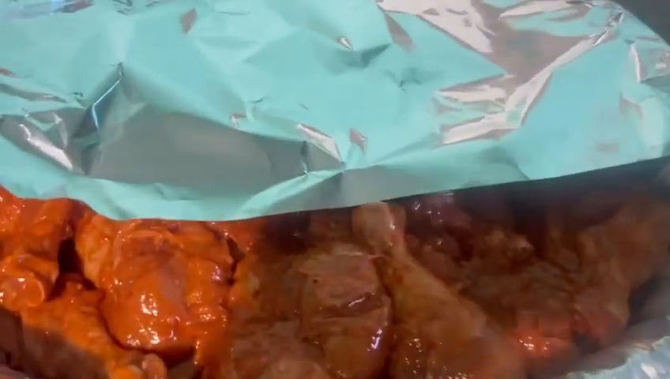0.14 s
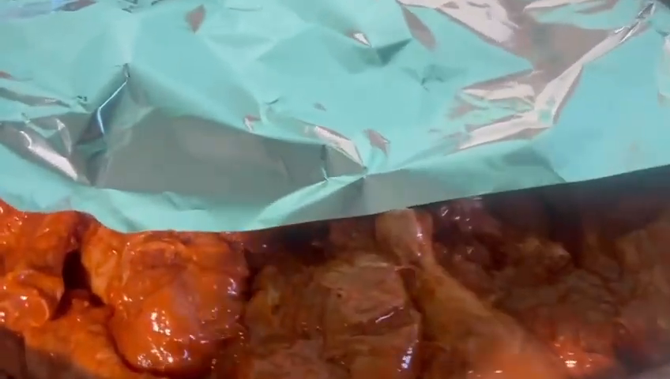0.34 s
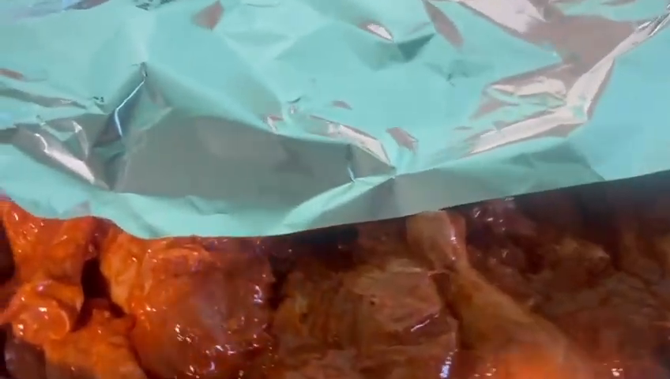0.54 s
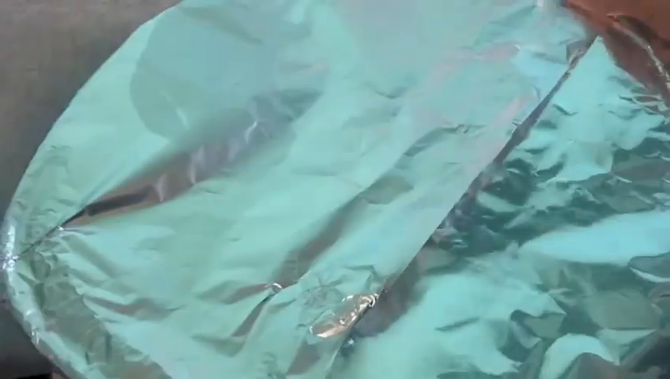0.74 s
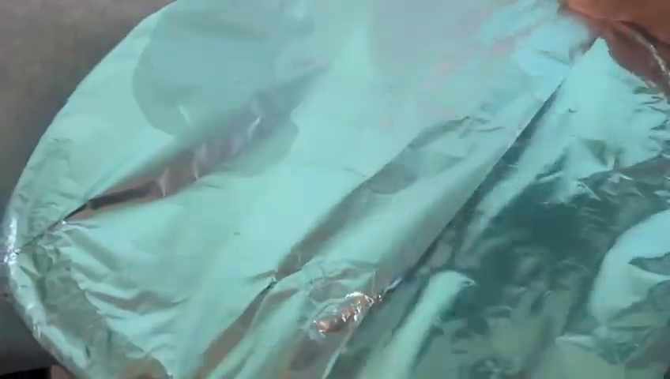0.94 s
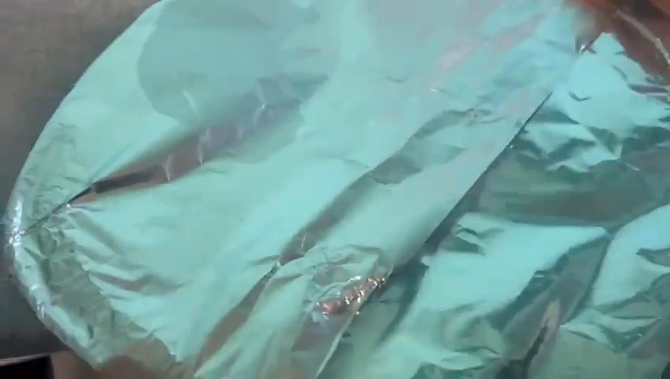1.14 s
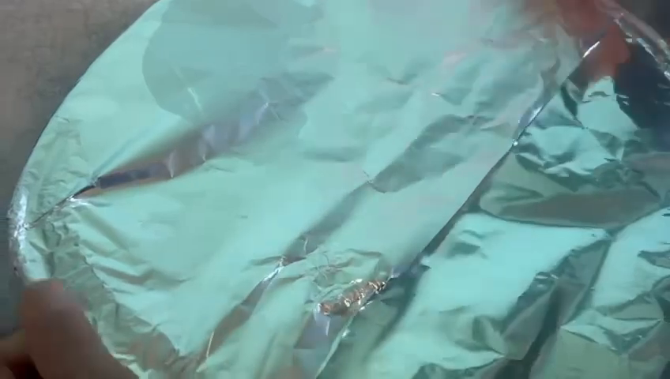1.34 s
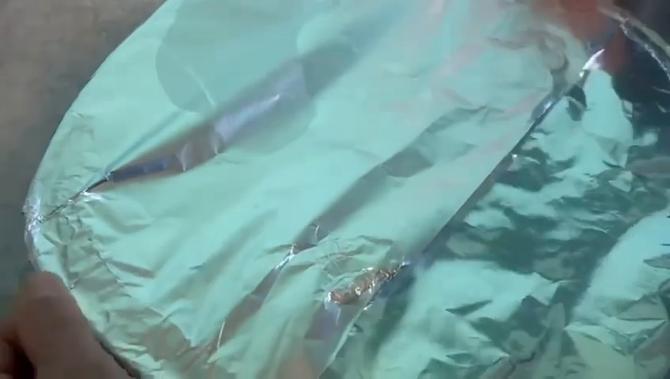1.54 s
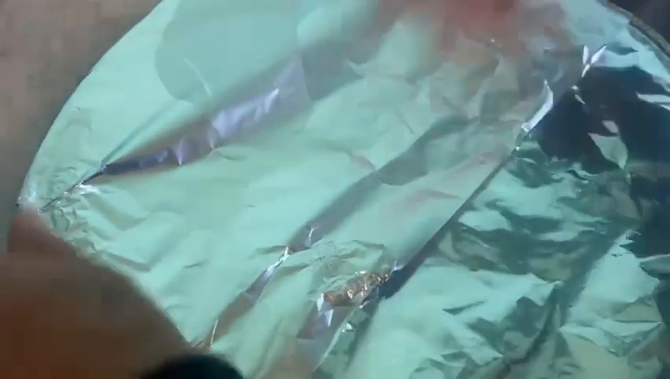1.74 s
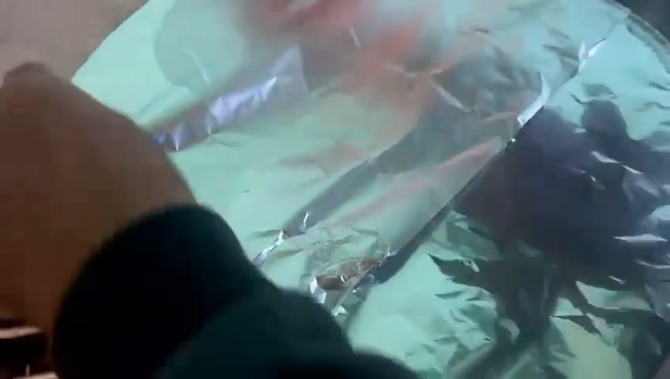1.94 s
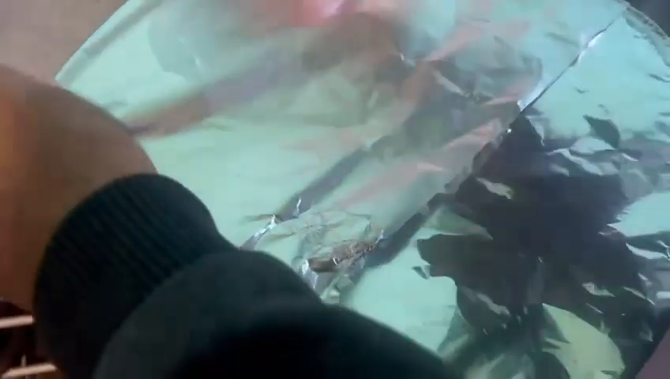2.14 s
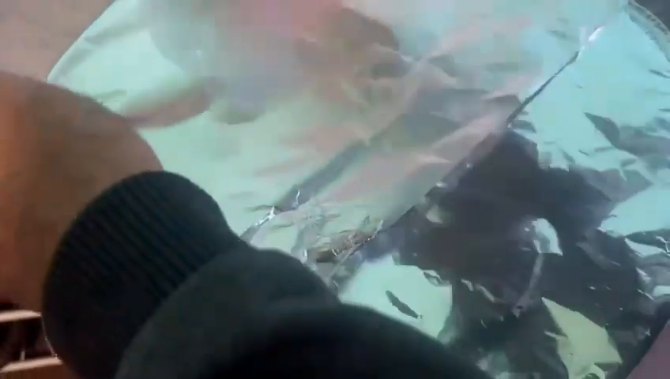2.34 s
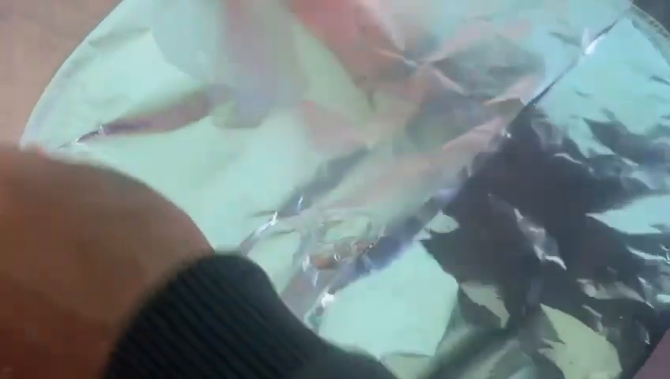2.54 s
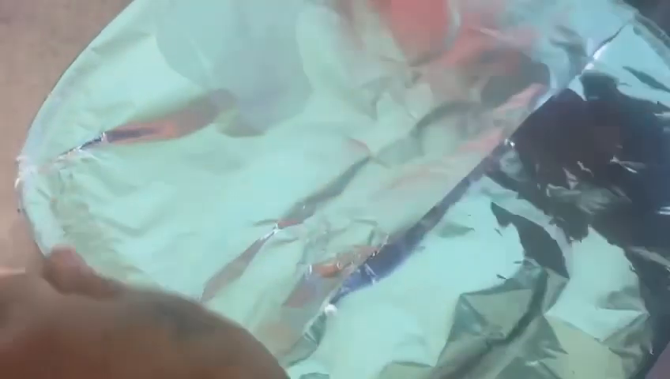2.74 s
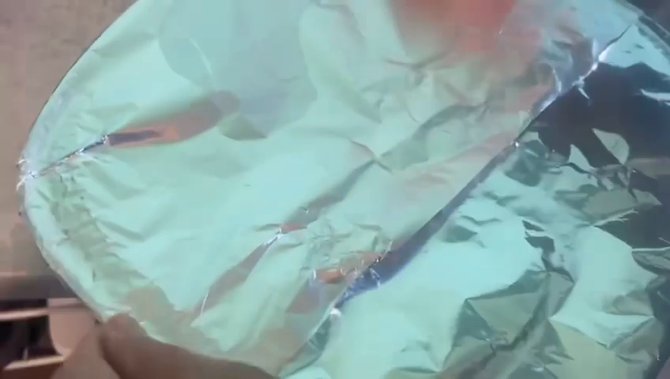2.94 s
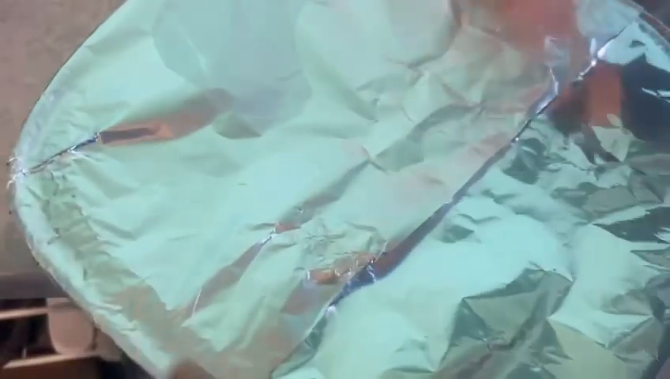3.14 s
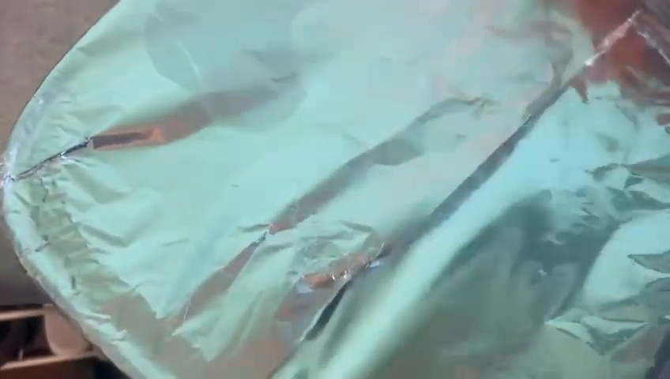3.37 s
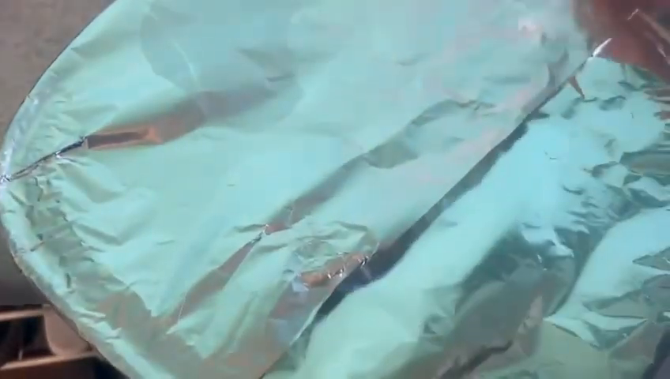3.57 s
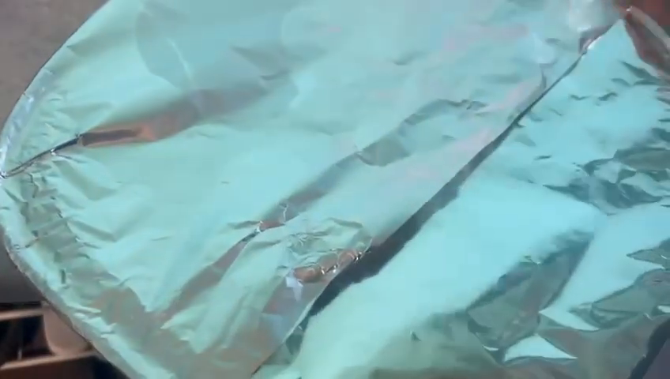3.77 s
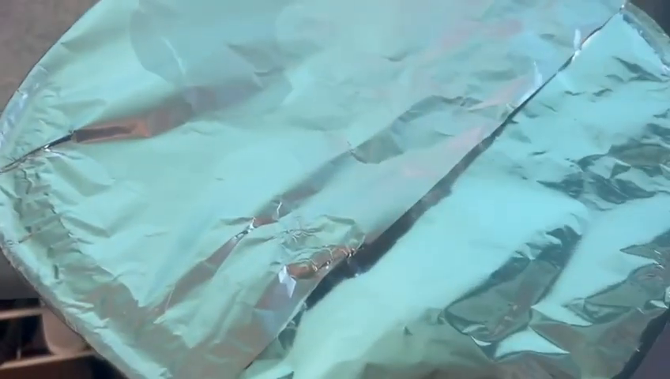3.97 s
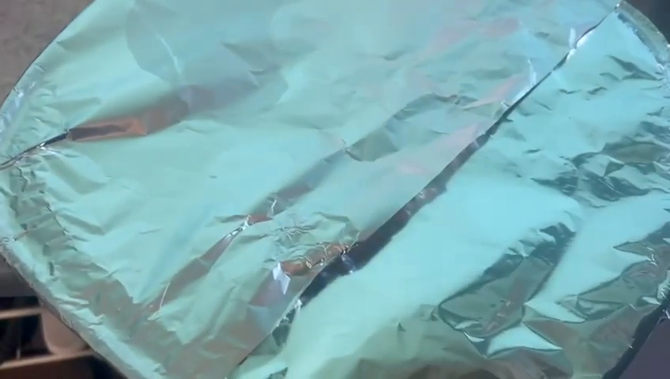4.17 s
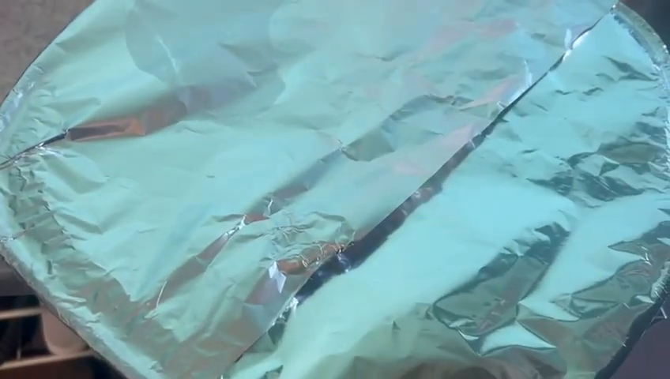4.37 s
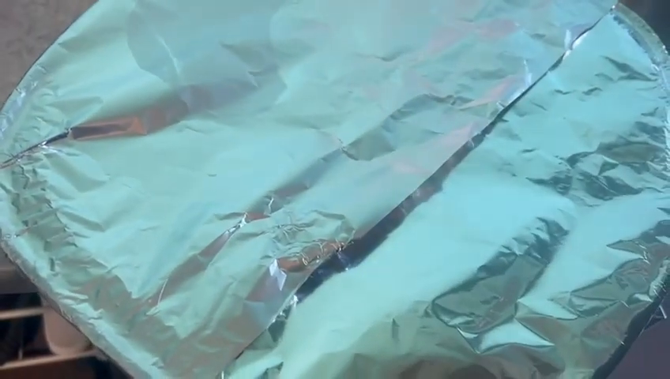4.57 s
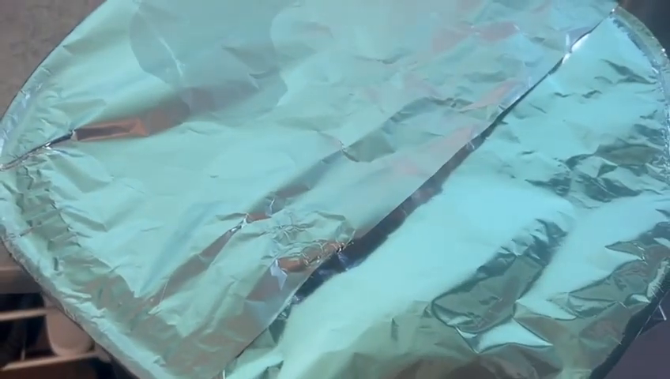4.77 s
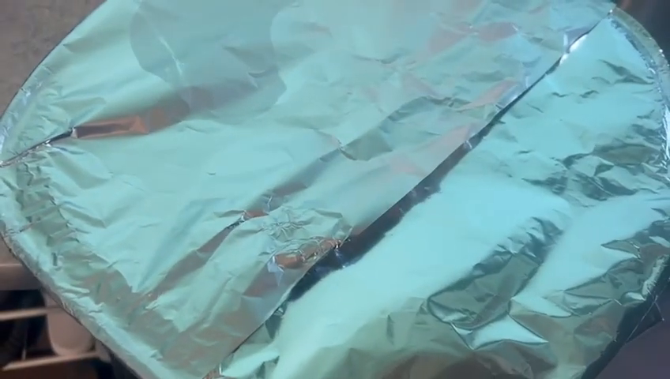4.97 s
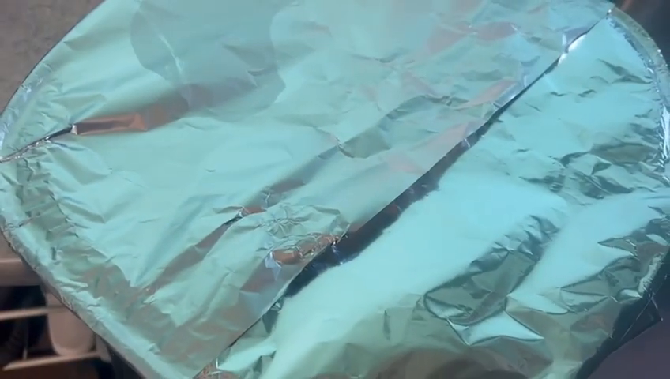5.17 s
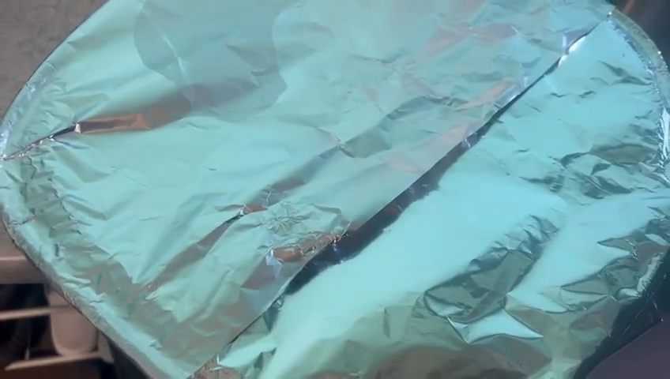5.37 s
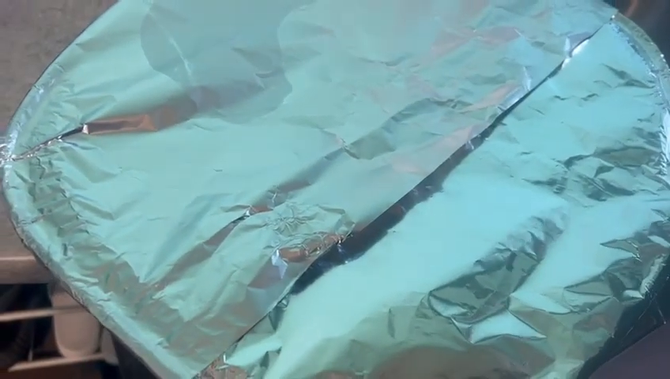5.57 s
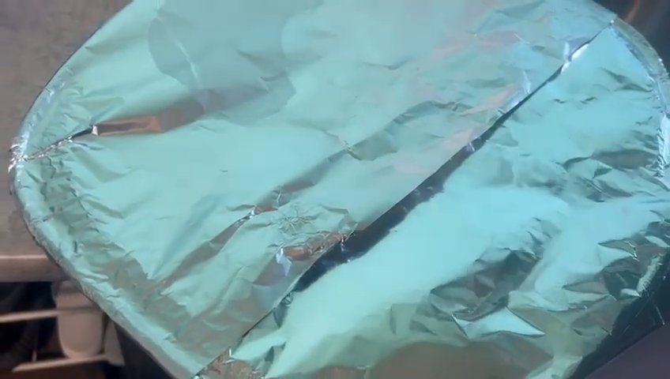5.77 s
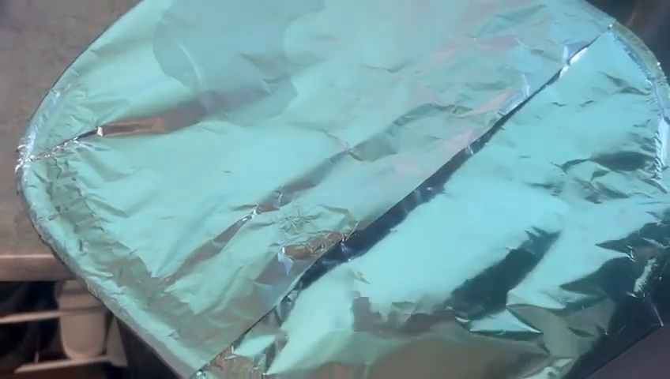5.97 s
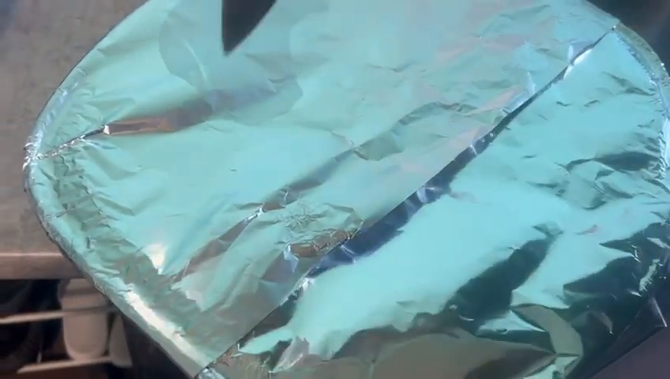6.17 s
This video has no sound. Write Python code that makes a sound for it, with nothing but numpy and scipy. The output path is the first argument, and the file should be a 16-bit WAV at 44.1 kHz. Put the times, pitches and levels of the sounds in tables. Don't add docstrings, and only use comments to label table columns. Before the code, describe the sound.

After a faint hum and a tiny dropout, foil crinkles loudly at close range; later a metal door clacks shut, then thin metallic squeaks and light foil touches.

```python
import sys
import numpy as np
from scipy import signal
from scipy.fft import rfft, irfft, next_fast_len
from scipy.io import wavfile
from scipy.ndimage import uniform_filter1d, map_coordinates

SR = 44100
rng = np.random.default_rng(int(sys.argv[2]) if len(sys.argv) > 2 else 0)


def boost_factor(decibels):
    exponent = np.asarray(decibels, float) / 20
    return 10 ** exponent


def output_pcm(signal):
    pcm = np.clip(np.atleast_2d(signal).T, -1, 1) * 32767
    wavfile.write(sys.argv[1], SR, np.round(pcm).astype(np.int16))


N = 273861
T = np.arange(N) / SR
SILENCE_START_S, SILENCE_END_S = 0.6672, 0.7135

# frequency in Hz, level in dB.
FAN_AIR = [(15, -38.5), (25, -12), (88, 1.5), (172, -9.5), (277, -5.5), (404, -10.5), (737, -21),
           (1020, -23.5), (2010, -33.5), (2650, -34.5), (3240, -49.5), (7780, -54), (10000, -74),
           (13000, -108), (22000, -120)]
# centre in Hz, width in Hz, level in dB before the silence, then the same after.
FAN_DRONES = [(91.2, 14, -51, 107.7, 3.8, -50), (189, 17, -60.5, 236.5, 21, -56),
              (286, 35, -54, 272.4, 13.7, -50)]

# start in seconds, swell in seconds, hold in seconds, top in dB,
# sag over the hold in dB.
SPREADING = [
    (0.0, 0.001, 0.16, -51.5, 30),
    (0.705, 0.0017, 0.15, -31.5, 0),
    (0.875, 0.062, 0.12, -19.5, 13.5),
    (1.075, 0.041, 0.066, -25.5, 4),
    (1.298, 0.0032, 0.085, -39, -5),
    (1.414, 0.032, 0.07, -21.5, 0),
    (1.592, 0.027, 0.082, -29.5, 3),
    (1.792, 0.018, 0.035, -34.5, 10.5),
]
CRIMPING = [(1.994, 0.034, 0.23, -21.5, 5.5), (2.249, 0.16, 0.18, -22, 12), (2.6, 0.022, 0.2, -25.5, 9.1),
            (2.81, 0.0086, 0.11, -38, 4.7), (2.928, 0.0024, 0.02, -31, 8.6), (2.983, .008, 0.049, -34, 17),
            (3.061, .004, 0.014, -42.5, 3), (3.089, 0.02, 0.047, -40.5, 3), (3.18, 0.031, .02, -39, 0.81),
            (3.2385, 0.022, 0.087, -24.5, 0.77), (3.352, 0.017, 0.14, -17.5, 19),
            (3.5, 0.012, 0.038, -27.5, 13.5), (3.6, 0.039, .07, -30, 8), (3.67, .03, .01, -34.5, 1),
            (3.706, .012, 0.098, -23.5, 12.6)]
TOUCHES = [
    (5.13, 0.0045, .02, -66, 5),
    (5.156, 0.003, 0.16, -46.5, 1),
    (5.285, 0.079, 0.072, -36.5, 5.5),
    (5.44, .005, 0.055, -46, 0.5),
    (5.68, 0.015, .03, -61.5, 10),
    (5.783, 0.013, 0.1, -51.5, 12),
    (5.95, 0.05, 0.027, -39, 10.5),
    (6.061, 0.006, 0.11, -35, 3),
]
SWELL_DB, RELEASE_DB_PER_S = 7, 424.5
# crackle in dB, rustle in dB.
SETTLING = [(-82.5, -69.5), (-80.5, -64.5)]
# time in seconds, rustle against the
# strokes in dB.
HAND_WEIGHT = [(0, 3.5), (.6, 12), (.75, -6.5), (.92, -6.5), (1.45, -10), (1.62, -6.5), (1.85, -1.5),
               (2.04, -4.5), (2.35, -10.5), (2.65, -7), (2.95, -0.5), (3.2, -1.5), (3.4, -8.5), (3.75, -10),
               (5.2, -2), (5.42, -8.5), (5.8, 6), (6.21, -7)]
# start in seconds, peak in dB, low pop in dB.
CREASES = [(.46, -69, 4), (0.822, -29, -15), (1.302, -18.5, -21), (0.991, -10, -18), (1.0874, -20.5, -12.5),
           (1.164, -13, -27.5), (1.339, -16, -10), (1.4276, -11, -5.5), (1.4404, -5.5, -17),
           (1.518, -5.5, -11.5), (1.6365, -10, -26), (1.6761, -12.5, -26), (1.799, -19, -14),
           (2.031, -9, -6), (2.17, -14.5, -2), (2.381, -11.5, -9.5), (2.493, -10, -18.5),
           (2.6215, -12.5, -11), (2.687, -14, -10.5), (2.7534, -14, -6.5), (2.8533, -20.5, -0.5),
           (3.0913, -21.5, -26), (3.3094, -15.5, -12), (3.5093, -14, -23), (3.709, -10.5, -23),
           (5.299, -27, -16), (5.3497, -20.5, -11), (5.4094, -21.5, -27), (5.9826, -15, -19),
           (6.0903, -14.5, -32)]
# start in seconds, peak in dB, low pop in dB.
SNAPS = [(0.8646, -18, -10), (0.8894, -18.5, -13), (0.9083, -5.5, -13.5), (0.9344, -11, -12.5),
         (1.2044, -27, -13), (1.3944, -23, -12.5), (1.4484, -9, -15.5), (1.4744, -10, -10),
         (1.5294, -10, -11), (1.7094, -18.5, -9.5), (1.8113, -25, -17), (1.9964, -22.5, -11.5),
         (2.0474, -7.5, -12), (2.0894, -21, -14.5), (2.1344, -18, -8), (2.1894, -14, -11.5),
         (2.2594, -16, -11), (2.3444, -14.5, -8), (2.3944, -11, -8.5), (2.4194, -16, -12),
         (2.5244, -17.5, -9), (2.5814, -11, -14), (2.6474, -19, -10), (2.7044, -16.5, -11),
         (2.8664, -19.5, -12), (2.9856, -24, -12), (3.1009, -25.5, -12.5), (3.1288, -25, -12.5),
         (3.2106, -38, -12), (3.2395, -21.5, -9), (3.2545, -22.5, -10.5), (3.2745, -15.5, -13.5),
         (3.3513, -16.5, -15), (3.3764, -9.5, -9.5), (3.4294, -26.5, -11), (3.524, -17.5, -12),
         (3.6272, -20, -11), (3.6411, -18.5, -8.5), (3.7214, -19.5, -12), (3.7594, -18, -11.5),
         (3.8194, -27, -17), (5.1645, -31, -11), (5.2094, -33.5, -12), (5.3744, -23, -13),
         (5.4344, -23, -12), (5.7942, -37, -12), (6.0696, -22.5, -13), (6.1294, -28, -15)]
CREASE_T60_S, SNAP_T60_S, SNAP_DB = 0.11, 0.045, -9
TRAY_T60_S, TRAY_DB = 0.38, -3.5
# frequency in Hz, level in dB.
CRACKLE_COLOUR = [(800, -33), (2000, -4.5), (3500, -1), (6000, -1), (8300, 5), (9500, -1.5), (11300, 0.5),
                  (13000, -22)]
# frequency in Hz, level in dB.
RUSTLE_COLOUR = [(100, -1.5), (250, -2), (600, 0.5), (1200, 3), (2200, -5.5), (4000, -4), (8000, -13)]

# start in seconds, peak in dB, pitch in Hz, thud in dB.
DENTS = [(0.151, -47, 1500, -20), (.218, -57, 1300, -15), (.29, -42.5, 1100, -9), (0.372, -47, 880, -4),
         (0.565, -46, 1080, -15), (.629, -50.5, 1100, -10), (.797, -15.5, 1160, -17), (.802, -25, 800, 2.5),
         (1.645, -27.5, 700, 3), (2.06, -22, 790, -5), (2.755, -27, 1200, -7.5), (2.819, -24, 1250, -20),
         (2.933, -30.5, 1290, -15), (3.351, -20, 1110, -13), (3.986, -51, 953, -11), (5.001, -56, 1047, -8),
         (5.134, -45, 1545, -11), (5.533, -29.5, 1300, 1)]
# start in seconds, peak in dB, pitch in Hz.
RIM_KNOCKS = [(0.9494, -28.5, 1370), (1.4488, -19.5, 1260), (2.1044, -33, 1120), (2.1869, -26.5, 1370),
              (2.6497, -25, 1360), (2.7127, -34, 1040), (2.7794, -23, 1320), (2.797, -33, 1010),
              (2.8644, -37, 1350), (2.9337, -25, 1320), (2.9642, -37, 1090), (2.9866, -34, 1270),
              (3.009, -37.5, 1110), (3.0255, -33.5, 1050), (3.1144, -41.5, 1200), (3.2061, -37, 1280),
              (3.2455, -30.5, 1190), (3.7228, -24, 1150)]
KNOCK_T60_S = 0.029

# start in seconds, peak in dB, brightness in dB, rattle t60 in seconds.
DOOR_CONTACTS = [(4.341, -44.5, 7, 0.035), (4.345, -27, -24, 0.054), (4.382, -14.5, -2, 0.037),
                 (4.389, -6.5, 0, 0.0099), (4.396, -7.5, -6.5, 0.016), (4.410, -14, -3.5, 0.022),
                 (4.434, -26, -12, 0.024), (4.46, -22, -25, 0.018), (4.48, -41.5, 6, 0.03),
                 (4.555, -36, -15, .04), (4.573, -31.5, -5.5, 0.074), (4.592, -34, -9, 0.03),
                 (4.718, -34, -13.5, 0.042)]
# frequency in Hz, width in Hz, level in dB.
DOOR_PANEL = [(122.7, 67, -8.5), (280, 116, -4.5), (472, 160, -6), (801, 190, -7), (1180, 190, 1),
              (1270, 100, 2.5), (1460, 210, -7), (1875, 270, -7), (2700, 450, -8.5), (4390, 500, -13),
              (5850, 430, -10), (6800, 300, -8.5), (7640, 250, -3), (8340, 340, -6), (9100, 280, -8)]
# frequency in Hz, level in dB, t60 in seconds.
DOOR_SKIN = [(259.6, -29, 0.21), (526, -35, 0.27), (815, -32, 0.16), (1093, -34, 0.42), (1190, -29, 0.31),
             (1268, -18, 0.14), (1480, -33, 0.22), (1834, -26, .1), (1940, -37, .3), (2640, -27, .15)]
# start in seconds, frequency in Hz, level in dB, t60 in seconds.
LATCH = [(5.6, 7650, -56, 0.13), (4.389, 7620, -29, 0.12), (4.408, 7650, -29, 0.098),
         (4.405, 9180, -32, 0.11), (4.408, 3900, -38, .09), (4.408, 7200, -33, .12),
         (4.392, 7230, -30, 0.12), (3.8, 7000, -53, .14), (4.55, 1220, -43, 0.22), (4.575, 1400, -42, .1),
         (4.58, 2300, -37, 0.11), (4.55, 6300, -54, .2)]
SLAM_S = 4.389

# start in seconds, frequency in Hz, level in dB, t60 in seconds.
RACK_BARS = [(5.245, 4303, -45, .3), (5.28, 2143, -53, .6), (5.345, 4660, -54, .15), (5.33, 2500, -53, .2),
             (5.385, 2143, -51.5, 1.1), (5.385, 3580, -50.5, 1), (5.42, 4303, -51.5, 1.4),
             (5.2, 5040, -50, .1), (5.34, 6000, -49, .1), (5.35, 2520, -48, .1), (5.44, 5060, -53, 0.54),
             (5.46, 6030, -62, 0.49), (5.17, 5800, -49, .2), (5.22, 6100, -51, .2), (5.28, 8700, -40, 0.16),
             (5.345, 9150, -40, .1), (5.37, 7725, -48, .15), (5.39, 8730, -43, .3), (5.4, 5950, -50, .15)]
# frequency in Hz, level in dB.
RACK_WIRES = [(3900, -83), (4650, -61), (5060, -62), (5350, -65.5), (5600, -73), (5850, -58), (6062, -70.5),
              (6450, -78), (6783, -74), (7747, -63.5), (8050, -63.5), (8737, -56), (9300, -77),
              (10900, -54.5), (11800, -65)]
# time in seconds, level in dB.
RUBBING = [
    (5.15, -46),
    (5.17, 0),
    (5.3, 8),
    (5.45, 6),
    (5.6, -32),
    (5.7, -43),
]

# frequency in Hz, t60 in seconds.
KITCHEN_T60 = [(150, 0.56), (1000, 0.48), (4000, 0.54), (9000, 0.26)]
# frequency in Hz, level in dB.
STEREO_WIDTH = [(30, -26.5), (120, -29), (250, -17), (650, -8.5), (1500, -3), (4000, -6.5), (5200, -2),
                (7000, -4), (12000, 3.5)]
DOOR_SIDE_DB, FAN_SIDE_DB = 0, 5
# frequency in Hz, level in dB.
FOIL_LEAN = [(60, -2.5), (150, 0), (360, -3), (870, 0.5), (2120, 4), (5160, 1.5), (12600, 0)]

# from frequency in Hz, share of moments lost in the
BAND_GAPS = [(0, 0, 0), (2300, .03, .05), (3100, .025, .45), (4500, .06, .2), (5500, .04, .5),
             (6900, 0, .2), (7600, 0, .6), (7950, 0, .99), (9000, .05, .03), (9450, .6, .03),
             (9640, 1, .03), (10500, .93, .03), (10670, .8, .05), (10840, .45, .05), (11020, .02, .15),
             (11400, .02, .9), (11700, .35, 1), (11870, .8, 1), (12050, 1, 1)]
# frequency in Hz, level in dB per bin.
BAND_FLOOR = [(7000, -112), (8200, -104), (9000, -102), (9700, -79.5), (12500, -84.5)]
FULL_MOMENTS = [.72, 1.19, 1.3, 1.42, 1.735, 2, 2.865, 2.93, 3.245, 3.54, 3.715, 4.39, 5.97]
FRAME_OFFSET = 476


def unit(x):
    return x / np.sqrt(np.mean(x ** 2) + 1e-20)


def along(points, hz):
    f, v = np.transpose(points)
    return np.interp(np.log(hz + 1), np.log(f + 1), v)


def curves(rows, rest):
    s, *cols = np.transpose(rows)
    return [np.interp(T, s, c, rest, rest) for c in cols]


def wobble(rate, size=N):
    knots = rng.standard_normal(int(size * rate / SR) + 4)
    return map_coordinates(knots, [T[:size] * rate])


def filtered(x, response):
    m = next_fast_len(N + 8192)
    return irfft(rfft(x, m) * response(np.fft.rfftfreq(m, 1 / SR)), m)[..., :N]


def add_at(track, start_s, sound):
    place = track[..., round(start_s * SR):][..., :sound.shape[-1]]
    place += sound[..., :place.shape[-1]]


def fan():
    late = T > SILENCE_END_S
    rush = unit(filtered(rng.standard_normal((2, N)), lambda hz: boost_factor(along(FAN_AIR, hz))))
    out = boost_factor(np.where(late, -44, -55)) * rush
    for row in FAN_DRONES:
        for gate, (centre, width, db) in ((~late, row[:3]), (late, row[3:])):
            noise = rng.standard_normal((2, N))
            drone = filtered(noise, lambda hz: 1 / (1 + ((hz - centre) / width * 2) ** 2))
            out += gate * boost_factor(db) * unit(drone)
    return out


def strokes():
    power = np.zeros(N)
    for s, swell_s, hold_s, db, sag_db in SPREADING + CRIMPING + TOUCHES:
        age = T[round(s * SR):][:SR] - s
        swell_s, hold_s = max(swell_s, .001), max(hold_s, .001)
        shape_db = np.interp(age, [0, swell_s, swell_s + hold_s], [-SWELL_DB, 0, -sag_db])
        release_db = RELEASE_DB_PER_S * np.maximum(age - swell_s - hold_s, 0)
        add_at(power, s, boost_factor(db + shape_db - release_db) ** 2)
    return power


def swarm(level_db, colour, rate, scatter_db, ring_s, patchy_db, count=16):
    kicks = (rng.random(N) < rate / SR) * boost_factor(scatter_db * rng.exponential(size=N)) * rng.standard_normal(N)
    kicks /= np.sqrt(abs(uniform_filter1d(kicks ** 2, 700)) + .05 * np.mean(kicks ** 2))
    facet = rng.integers(count, size=N // 500 + 1).repeat(500)[:N]
    t = np.arange(4096) / SR
    decay = boost_factor(-60 * t / ring_s) + 0.69 * boost_factor(-60 * t / 0.0027)
    pair = np.zeros((2, N))
    for k in range(count):
        shiver = rng.standard_normal((2, len(t))) * decay
        patches = rng.standard_normal(24)
        tint = boost_factor(patchy_db * np.interp(np.arange(2049), np.linspace(0, 2048, 24), patches))
        shiver = irfft(rfft(np.roll(shiver, 32, 1)) * tint)
        shiver /= np.linalg.norm(shiver[0])
        struck = kicks * (facet == k) * boost_factor(level_db)
        pair += signal.oaconvolve(struck[None], shiver, axes=1)[:, :N]
    gain = lambda hz: boost_factor(along(colour, hz))
    norm = np.sqrt(np.mean(gain(np.linspace(0, SR / 2, 2000)) ** 2) * np.mean(kicks ** 2))
    return filtered(pair, gain) / norm


def foil():
    work = strokes()
    rest_db = np.array(SETTLING)[(T > SILENCE_END_S) * 1].T
    crisp = work * boost_factor(-2.0) ** 2 + boost_factor(rest_db[0]) ** 2
    fade = boost_factor(-120 / TRAY_T60_S / SR)
    work = work + boost_factor(TRAY_DB) ** 2 * signal.lfilter([1 - fade], [1, -fade], work)
    low = work * boost_factor(curves(HAND_WEIGHT, rest=0)[0] - 3.5) ** 2 + boost_factor(rest_db[1]) ** 2
    rise_s = .002
    for s, db, low_db in CREASES:
        age = np.clip(T[round(s * SR):][:SR // 4] - s, 0, 1)
        burst = (1 - np.exp(-age / rise_s)) * boost_factor(db - 10.5 - 60 * age / CREASE_T60_S) ** 2
        add_at(crisp, s, burst)
        add_at(low, s, burst * boost_factor(low_db) ** 2)
    age = T[:SR // 10]
    for s, db, low_db in SNAPS:
        burst = (1 - np.exp(-age / rise_s)) * boost_factor(db + SNAP_DB - 60 * age / SNAP_T60_S) ** 2
        add_at(crisp, s, burst)
        add_at(low, s, burst * boost_factor(low_db) ** 2)
    clump = 0.34 * wobble(45)
    crackle = swarm(10 * np.log10(crisp) + clump, CRACKLE_COLOUR, rate=5500, scatter_db=.8,
                    ring_s=0.041, patchy_db=2.0)
    rustle = swarm(10 * np.log10(low) + clump, RUSTLE_COLOUR, rate=2500, scatter_db=3.0,
                   ring_s=0.041, patchy_db=1.5)
    return crackle + rustle


def pops():
    out = np.zeros((2, N))
    t = np.arange(SR // 10) / SR
    for s, db, hz, thud_db in DENTS:
        ring = sum(np.sin(2 * np.pi * k * hz * t) for k in (.75, 1, 1.3)) * boost_factor(-60 * t / 0.012) / 2
        thud = boost_factor(thud_db - 60 * t / 0.03) * np.sin(2 * np.pi * 300 * t)
        tick = .25 * rng.standard_normal(len(t)) * boost_factor(-60 * t / .008)
        add_at(out, s, boost_factor(db) * (ring + thud + tick))
    for s, db, hz in RIM_KNOCKS:
        swell = (1 - np.exp(-t / 0.0017)) * boost_factor(db - 60 * t / KNOCK_T60_S)
        tones = np.sin(2 * np.pi * hz * t) + .6 * np.sin(2 * np.pi * 0.97 * hz * t)
        add_at(out, s, swell * tones)
    return out


def door():
    out = np.zeros((2, N))
    t = np.arange(SR // 4) / SR
    hz = np.fft.rfftfreq(len(t), 1 / SR)
    panel = 0
    for k, (centre, width, db) in enumerate(DOOR_PANEL):
        damping = 1j * hz * width
        panel = panel + (-1) ** k * boost_factor(db) * damping / (centre * centre - hz * hz + damping)
    for s, db, bright_db, t60 in DOOR_CONTACTS:
        decay = boost_factor(-60 * t / max(t60, .005)) + 0.24 * boost_factor(-60 * t / 0.21)
        rattle = rng.standard_normal((2, len(t))) * decay
        colour = (panel + boost_factor(-31.0)) * boost_factor(bright_db * hz / 4000) / (1 + 1j * hz / 7500) ** 4
        add_at(out, s, boost_factor(db + 15.0) * irfft(rfft(rattle) * colour, len(t)))
    age = np.arange(SR // 2) / SR
    for f, db, t60 in DOOR_SKIN:
        phase = 2 * np.pi * f * age + 0.76 * wobble(30, size=len(age))
        add_at(out, SLAM_S, boost_factor(db - 60 * age / t60) * np.sin(phase))
    for s, f, db, t60 in LATCH:
        phase = 2 * np.pi * f * age + 1.0 * wobble(60, size=len(age))
        add_at(out, s, boost_factor(db - 60 * age / t60) * (1 - np.exp(-age / 0.0036)) * np.sin(phase))
    return out


def rack():
    out = np.zeros((2, N))
    first = round(RUBBING[0][0] * SR)
    t = T[first:]

    def flicker(depth_db):
        return boost_factor(depth_db * np.array([wobble(20.9, size=len(t)), wobble(24.7, size=len(t))]))

    for s, hz, db, t60 in RACK_BARS:
        age = np.maximum(t - s, 0)
        swell = boost_factor(db - 60 * age / t60) * (1 - np.exp(-age / 0.0092))
        phase = 2 * np.pi * hz * t + .7 * wobble(35, size=len(t))
        out[:, first:] += swell * flicker(4) * np.sin(phase)
    rub = boost_factor(curves(RUBBING, rest=-100)[0][first:])
    for hz, db in RACK_WIRES:
        phase = 2 * np.pi * hz * t + 1.9 * wobble(90.2, size=len(t))
        out[:, first:] += rub * boost_factor(db) * flicker(6.0) * np.sin(phase)
    return out


def kitchen(x):
    out = np.zeros((2, N + 2 * SR))
    step = SR // 4
    for a in range(0, N, step):
        hz, t, z = signal.stft(rng.standard_normal((2, 30000)), SR, nperseg=256)
        decay = boost_factor(-60 * t / along(KITCHEN_T60, hz)[:, None])
        tail = signal.istft(z * decay, SR, nperseg=256)[1]
        wet = signal.fftconvolve(x[:1, a:a + step], tail / np.linalg.norm(tail[0]), axes=1)
        out[:, a + 300:][:, :wet.shape[1]] += wet
    return out[:, :N]


def spread(pair):
    lead = filtered(pair[0], lambda hz: .25j * (hz < 8000))
    side = filtered(0.97 * pair[1] + lead, lambda hz: boost_factor(along(STEREO_WIDTH, hz)))
    return np.array([pair[0] + side, pair[0] - side])


def scene():
    near = foil() + pops() * [[1], [.5]] + rack()
    far = door()
    sheet = filtered(spread(near), lambda hz: boost_factor(along(FOIL_LEAN, hz) * [[.5], [-.5]]))
    room = kitchen(boost_factor(-10.5) * near + boost_factor(-8.5) * far)
    around = far * boost_factor([[0], [DOOR_SIDE_DB]]) + fan() * boost_factor([[0], [FAN_SIDE_DB]]) + room
    return sheet + spread(around)


def thin_bands(pair):
    hz, t, z = signal.stft(np.pad(pair, ((0, 0), (FRAME_OFFSET, 0))), SR, "cosine", 2048, 1024)
    band = np.arange(len(hz)) // 8
    power = np.add.reduceat(abs(z) ** 2, np.arange(0, len(hz), 8), 1)[:, band] / 8
    luck = uniform_filter1d(rng.standard_normal((2, band[-1] + 1, len(t))), 3)
    luck = (luck.argsort().argsort() / len(t))[:, band]
    start, *share = np.transpose(BAND_GAPS)
    kept = luck >= np.array(share)[:, np.searchsorted(start, hz, "right") - 1, None]
    sudden = abs(t[:, None] - FRAME_OFFSET / SR - FULL_MOMENTS).min(1) < 512 / SR
    opened = sudden & (hz < np.array([[12200], [10000]]))[..., None]
    floor = boost_factor(2 * along(BAND_FLOOR, hz))[:, None] * (hz > 6000)[:, None]
    kept = (kept | opened) & (power > floor)
    weak = power * np.array([.12, .35])[:, None, None] * (hz > 1200)[:, None]
    kept &= abs(z) ** 2 > weak
    return signal.istft(z * kept, SR, "cosine", 2048, 1024)[1][:, FRAME_OFFSET:FRAME_OFFSET + N]


def low_pass(x):
    return signal.sosfilt(signal.butter(12, 13180, fs=SR, output="sos"), x)


def record(dry):
    dry = dry / (1 + abs(dry / .95) ** 6) ** (1 / 6)
    dry = filtered(dry, lambda hz: 1 / (1 + (38 / (hz + 1)) ** 4))
    mid, side = thin_bands(np.array([dry[0] + dry[1], dry[0] - dry[1]]) / 2)
    heard = (T < SILENCE_START_S) | (T > SILENCE_END_S)
    return low_pass(np.array([mid + side, mid - side]) * heard)


dry = scene()
out = record(dry)
output_pcm(out)
```